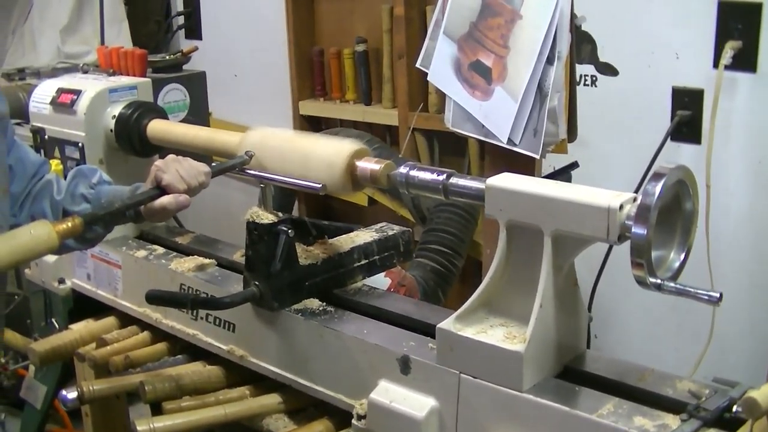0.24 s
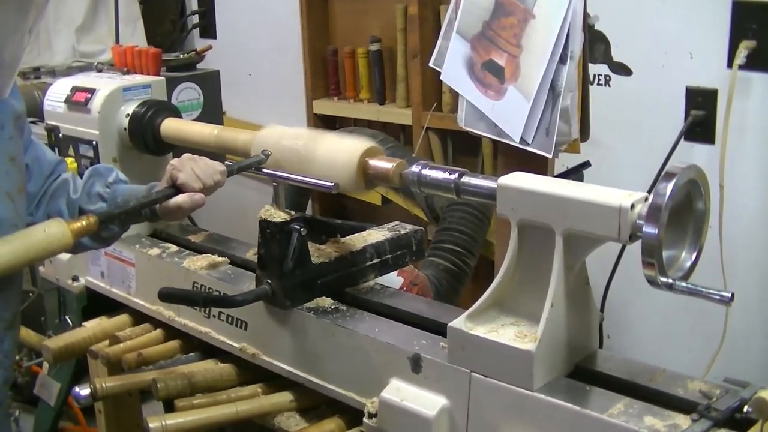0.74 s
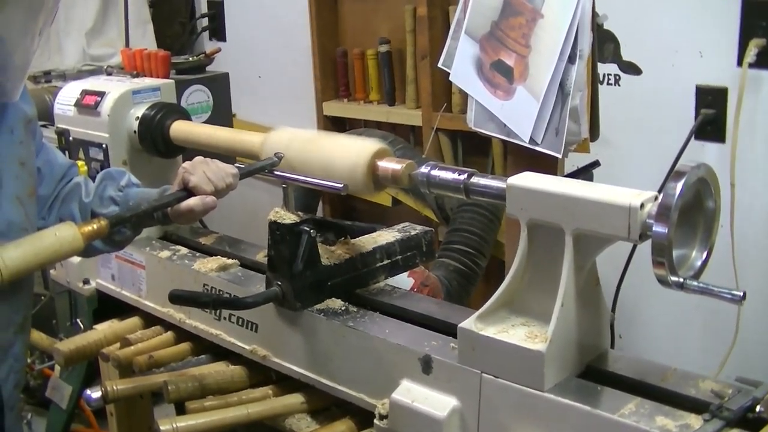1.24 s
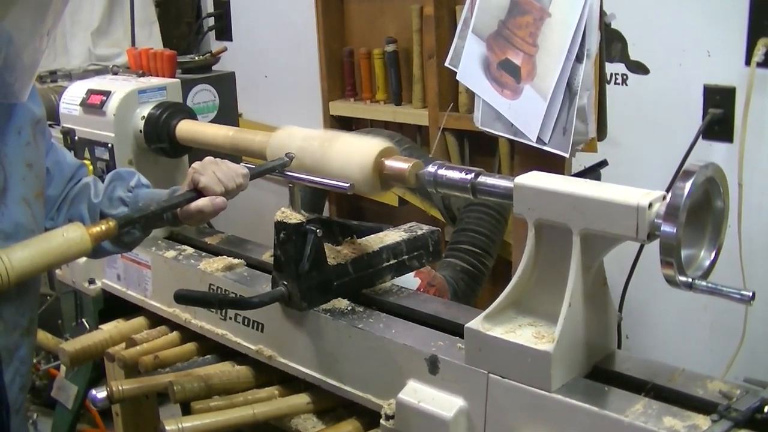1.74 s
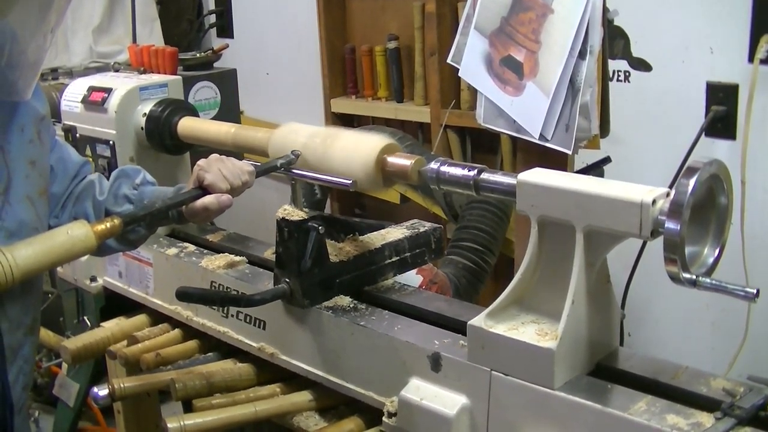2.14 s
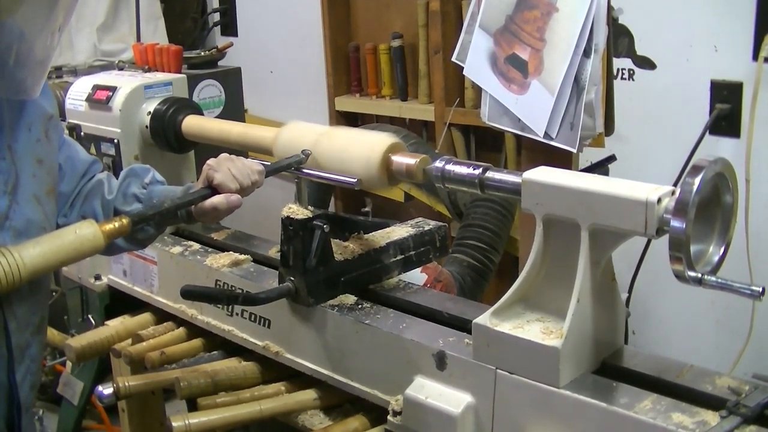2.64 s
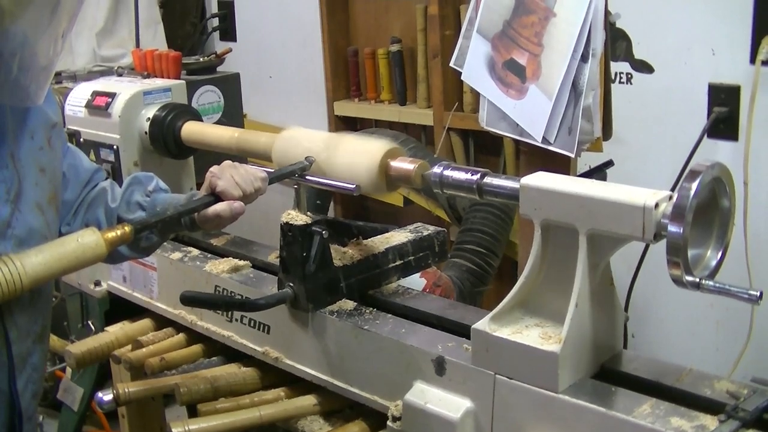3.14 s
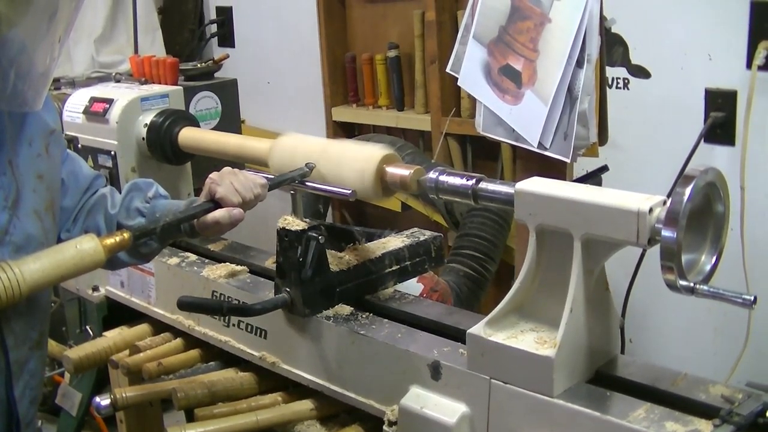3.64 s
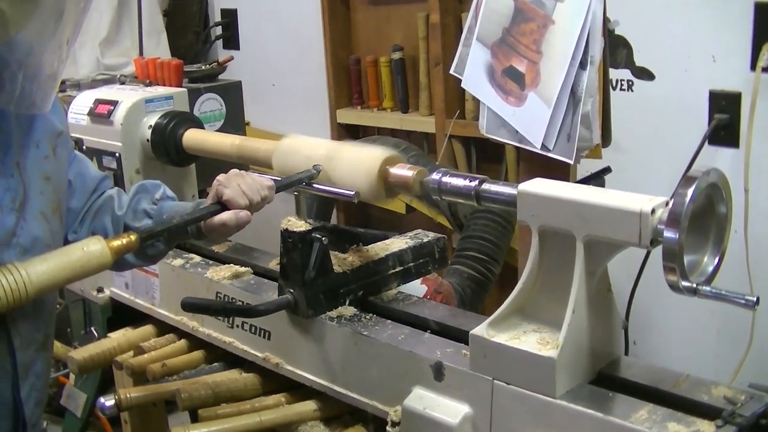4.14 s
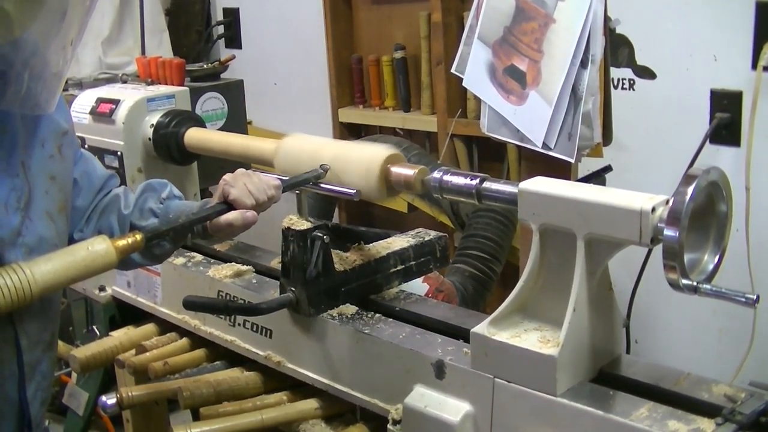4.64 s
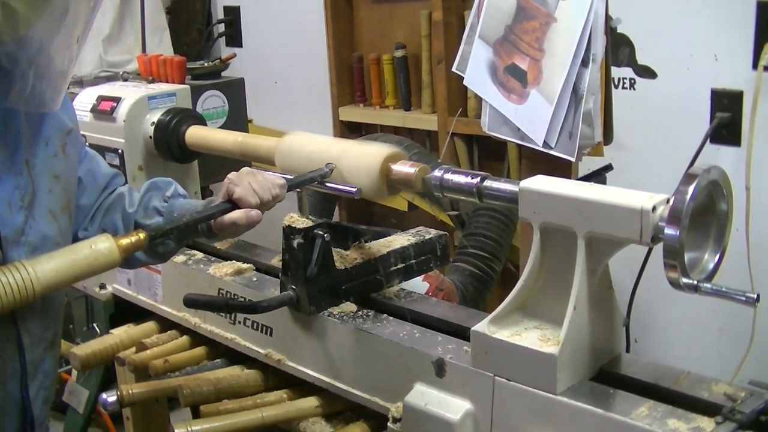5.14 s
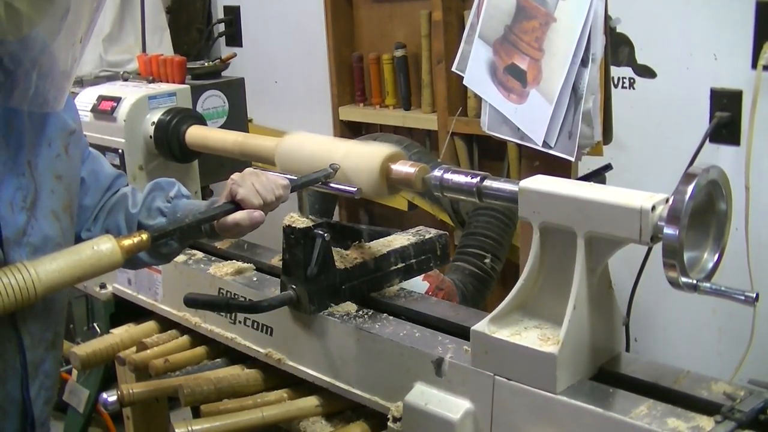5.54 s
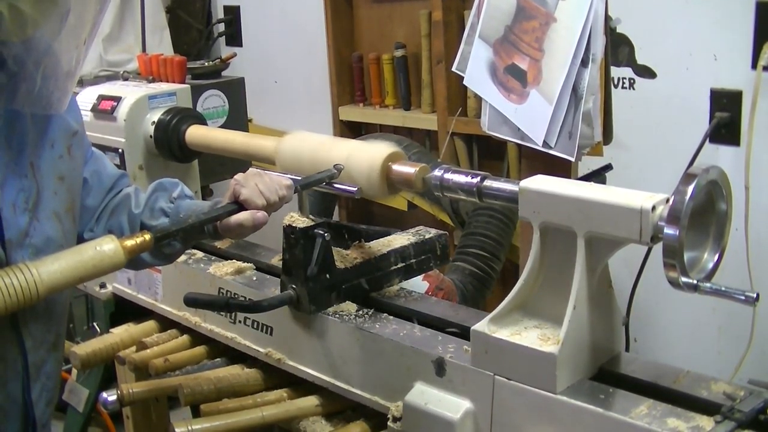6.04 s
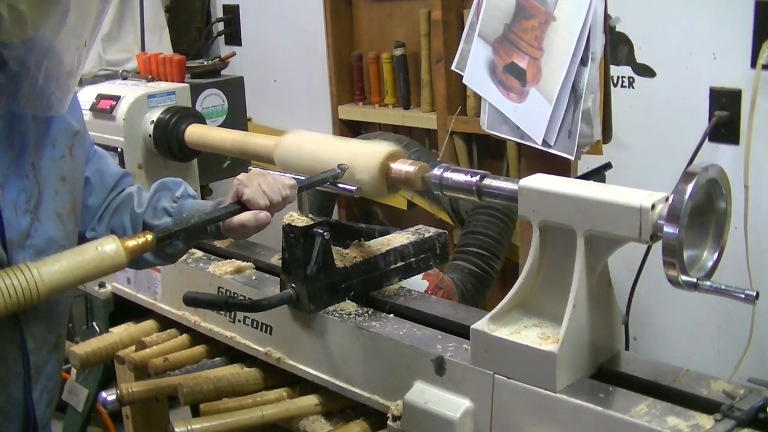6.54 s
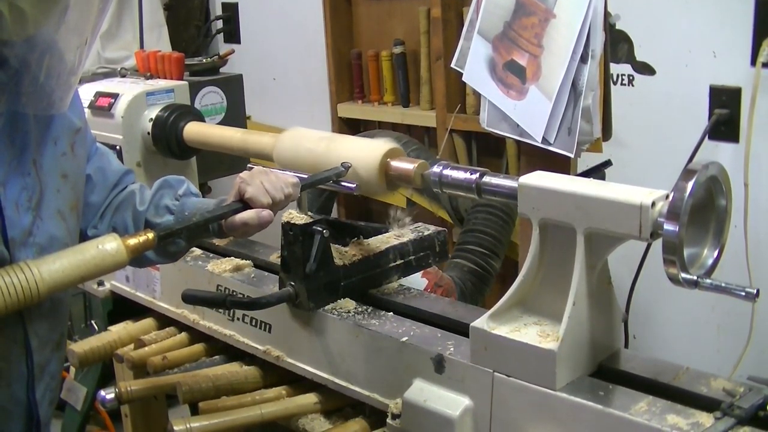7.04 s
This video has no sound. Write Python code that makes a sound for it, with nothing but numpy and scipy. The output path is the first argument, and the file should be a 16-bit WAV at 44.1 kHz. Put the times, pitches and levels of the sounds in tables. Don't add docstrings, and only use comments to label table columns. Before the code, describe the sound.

A wood lathe runs throughout while a steel gouge scrapes the spinning blank. The tearing is dense and raspy, roughened by a very fast buzzing flutter, with irregular hard catches and clacks. The tool rest rings and squeals around the upper mids, and chips tick on metal. Close, thin-bassed, slightly overloaded stereo microphone in a small room.

```python
import sys
import numpy as np
from scipy import signal
from scipy.fft import rfft, irfft, next_fast_len
from scipy.io import wavfile

SR = 44100
rng = np.random.default_rng(int(sys.argv[2]) if len(sys.argv) > 2 else 0)


def wrap_up_sound(samples):
    columns = np.atleast_2d(samples).T
    tamed = np.clip(columns, -1, 1)
    steps = np.round(tamed * 32767).astype(np.int16)
    wavfile.write(sys.argv[1], SR, steps)


def magnitude_from_level(level_db):
    exponent = np.asarray(level_db, float) / 20
    return 10 ** exponent


N = 320852
NOW_S = np.arange(N) / SR
GRAIN = rng.uniform(-1.7, 1.7, 200)


def rms_one(x):
    return x / np.sqrt(np.mean(x ** 2) + 1e-20)


def at_hz(points, hz):
    p = np.array(points)
    return np.interp(np.log(hz + 1), np.log(p[:, 0] + 1), p[:, 1])


def over_time(points):
    return np.interp(NOW_S, *np.transpose(points))


def bandpass(x, low_hz, high_hz):
    return signal.sosfilt(signal.butter(2, [low_hz, high_hz], "band", fs=SR, output="sos"), x)


def drift(rate_hz):
    r = np.exp(-40 * np.pi * rate_hz / SR)
    slow = signal.lfilter([1], [1, -2 * r, r * r], rng.standard_normal(N // 20 + 2002))[2000:]
    return np.interp(np.arange(N) / 20, np.arange(len(slow)), rms_one(slow))


def dying(times_s, sizes, tau_s):
    marks = np.full(N, 1e-12)
    at = np.clip((np.asarray(times_s) * SR).astype(int), 0, N - 1)
    np.add.at(marks, at, sizes)
    return signal.lfilter([1], [1, -np.exp(-1 / (tau_s * SR))], marks)


def resonate(x, hz, width_hz):
    r = np.exp(-np.pi * width_hz / SR)
    gain = np.sqrt((1 - r * r) / 2)
    return signal.lfilter(gain * np.array([1, 0, -1]), [1, -2 * r * np.cos(2 * np.pi * hz / SR), r * r], x)


def sing(turns, width_hz, force, steady):
    force = force[::4]
    r = np.exp(-4 * np.pi * width_hz / SR)
    shape = (2, len(force))
    shake = force * (rng.standard_normal(shape) + 1j * rng.standard_normal(shape))
    swing = signal.lfilter([np.sqrt(1 - r * r)], [1, -r], shake)
    swing = swing + steady * signal.lfilter([1 - r], [1, -r], force)
    return np.real(np.repeat(swing, 4, axis=1)[:, :N] * np.exp(2j * np.pi * turns))


def hand():
    # (time [s], level [dB])
    pressure = [
        (0.0, -21.5),
        (2.37, -22),
        (2.41, -23),
        (3.04, -22),
        (6.3, -20.5),
        (6.32, -19.5),
        (6.79, -19.5),
        (7.11, -21),
        (7.28, -23.5),
    ]
    # (time [s], depth [dB], length [s])
    bounces = [(0.515, -3, 0.18), (1.204, -4.5, 0.16), (1.815, -7, 0.048), (2.421, -2, 0.021),
               (2.502, -3.5, 0.018), (2.973, -5.5, 0.053), (3.252, -5, 0.041), (3.334, -6.5, 0.13),
               (3.636, -3, 0.049), (3.766, -4.5, 0.09), (4.193, -2, 0.073), (4.384, -4.5, 0.084),
               (4.574, -3, 0.25), (4.8, -2.5, 0.13), (5.105, -4, 0.058), (5.419, -11, 0.03),
               (5.594, -2, 0.076), (5.942, -4, 0.051), (6.375, -4.5, 0.19), (6.622, -6, 0.044),
               (6.98, -6, 0.043), (7.14, -3.5, 0.053)]
    # (time [s], level [dB])
    travel = [(0, -21.5), (.45, -20), (.6, -30), (.76, -18), (1.05, -26), (1.7, -30), (2.1, -42),
              (2.8, -40), (3.5, -27.5), (4.2, -51), (4.75, -31), (5.0, -27), (5.35, -20), (6.9, -21.5),
              (7.28, -25)]
    # (time [s], level [dB])
    seated = [(0, -21), (.6, -14.5), (1.1, -31), (1.5, -30), (2.33, -18), (2.45, -29), (2.85, -17),
              (3.2, -19), (3.3, -12), (3.72, -26.5), (3.8, -21), (4.3, -20), (4.5, -15.5), (5.3, -19),
              (6.2, -21), (6.6, -17.5), (6.8, -14), (7.0, -41)]
    pressure_db = over_time(pressure)
    coarse_s = NOW_S[::20]
    ease_db = sum(db * np.exp(-(2.48 * (coarse_s - s) / length_s) ** 2) for s, db, length_s in bounces)
    ease_db = np.interp(NOW_S, coarse_s, ease_db)
    scrape_db = pressure_db + 0.78 + ease_db
    blank_db = over_time(travel) + 0.54 * ease_db
    rest_db = over_time(seated) + 2 * ease_db
    hiss_db = pressure_db - 9 - 0.013 * ease_db + 4 * drift(6)
    return scrape_db, blank_db, rest_db, hiss_db


def ridges(tick_db, spread_db, tau_s):
    first_s, spacing_s = .0012, .004995
    heights_db = [7, -3, 11.5, 14, 15.5, -2.5, 18, 8.5]
    times_s = np.arange(first_s, N / SR, spacing_s)
    uneven_db = spread_db * rng.standard_normal(len(times_s))
    height = magnitude_from_level(tick_db + np.resize(heights_db, len(times_s)) + uneven_db)
    return rms_one(1 + dying(times_s, height, tau_s))


def corner_hits():
    first_s, turn_s, spread_db, dig_force_db = .0203, .03996, 4.5, -1.5
    # (time [s], bite [dB], early [ms])
    corner = [(0, -28, -2), (.72, -47, -3.5), (1.25, -19.5, 1), (1.6, -16, -3), (2.15, -24, -2.5),
              (2.6, -74, -19), (2.9, -24, 6), (3.3, -21, -3.5), (3.88, -32, 15), (3.92, -27, 3),
              (4.42, -21, 8), (4.46, -37, -4), (5.45, -47, -4), (5.85, -32, 1), (6.731, -22, 2),
              (7.0, -43, 14), (7.2, -22, -6)]
    # (time [s], peak level [dB])
    digs = [(0.1022, -38), (0.4599, -22), (0.6584, -25), (0.778, -13), (1.1398, -15), (1.499, -33),
            (1.699, -37), (1.8994, -44), (1.978, -33), (2.0582, -39), (2.0986, -47), (2.178, -13),
            (2.338, -18), (2.9567, -6.5), (3.0994, -41), (3.817, -14.5), (3.935, -38), (4.016, -12),
            (4.0976, -34), (4.1719, -25), (4.3337, -10), (4.595, -13.5), (4.637, -12.5), (5.619, -13),
            (5.698, -9.5), (5.8187, -6.5), (5.896, -10), (6.054, -13), (6.18, -7), (6.455, -17)]
    s, bite_db, early_ms = np.transpose(corner)
    turn = np.arange(first_s, N / SR, turn_s)
    hit_s = turn - np.interp(turn, s, early_ms) / 1000
    hit_db = np.interp(turn, s, bite_db) + spread_db * GRAIN[:len(turn)]
    dig_s, dig_db = np.transpose(digs)
    return np.r_[hit_s, dig_s], np.r_[hit_db, dig_db + dig_force_db]


def catches(hz, spread_db, tau_s):
    # (time [s], peak level [dB], dull part [dB], bright part [dB])
    caught = [(0.301, -20, -8, -20), (0.41, -30, -2, 8), (0.513, -23, -5, -24), (0.9406, -11, -21, -29),
              (1.002, -9, -15, -34), (1.052, -10.5, -18, -13), (1.2088, -16.5, -35, -2),
              (1.778, -31, -17, -19), (2.0184, -33, -31, -28), (2.3714, -14.5, -15, -15),
              (2.591, -12, -12, -14), (2.878, -11.5, -37, -6), (3.143, -23, -41, -38),
              (3.2092, -17, -22, -28), (3.284, -12, -31, -23), (3.4007, -18, -20, -19),
              (3.605, -12, -29, -27), (3.777, -10, -24, -27), (4.062, -18, -19, -38),
              (4.413, -11.5, -49, -22), (5.057, -14.5, -11, -14), (5.198, -8, -29, -37),
              (5.306, -23, -32, -2), (5.4374, -12, -24, -27), (6.2387, -11, -20, -31),
              (6.6903, -21, -15, 2), (6.846, -12.5, -26, -31), (6.8977, -7, -19, -13),
              (7.004, -19, -17, -19.5), (7.056, -12, -32, -13)]
    hit_s, hit_db = corner_hits()
    hits = [hit_s, hit_db, 0 * hit_s - 19.5, 0 * hit_s - 15]
    s, peak_db, dull_db, bright_db = np.hstack([np.transpose(caught), hits])
    if hz < 1200:
        part_db = dull_db + 25
    elif hz > 6000:
        part_db = bright_db + 34.5
    else:
        part_db = 0
    return dying(s, magnitude_from_level(peak_db + part_db + spread_db * rng.standard_normal(len(s))), tau_s)


def fibres(spread_db):
    return rms_one(rng.standard_normal((2, N)) * magnitude_from_level(spread_db * rng.standard_normal(N)))


def scrape(contact, scrape_db, hiss_db):
    # (frequency [Hz], density [dB per Hz])
    colour = [(88, -73), (150, -112), (303, -14), (494, -10.5), (759, 4), (1020, -8), (1240, 4),
              (2180, 1.5), (3100, 1), (4320, -7), (5150, -58), (7040, -37), (9260, -52), (14500, -94),
              (16000, -51)]
    out = 0
    edges_hz = 150 * 2 ** np.arange(0, 7, .5)
    grains = [fibres(1.9), fibres(3.1)]
    for k, (low_hz, high_hz) in enumerate(zip(edges_hz, edges_hz[1:])):
        hz = np.sqrt(low_hz * high_hz)
        patchy = magnitude_from_level(2.2 * drift(9))
        steady = patchy * magnitude_from_level(hiss_db + 33.0 if hz > 6500 else scrape_db - 3.0)
        touch = np.clip(hz / 1500, 0, 1)
        tear = magnitude_from_level(-8.0) * catches(hz, 1.0, 0.015 * (1000 / hz) ** 0.35)
        crack = magnitude_from_level(-35.0) * catches(hz, 0.73, 0.00025)
        force = steady * (1 + touch * (contact - 1)) + touch * (tear + crack)
        out = out + magnitude_from_level(at_hz(colour, hz) + 6) * bandpass(grains[k % 2] * force, low_hz, high_hz)
    return out


def blank(level_db, contact):
    # (time [s], frequency [Hz])
    pitch = [
        (0, 960),
        (.25, 966),
        (.45, 972),
        (.75, 977),
        (4.8, 978),
        (6.08, 977),
        (6.2, 958),
        (6.6, 950),
        (7.0, 938),
        (7.28, 932),
    ]
    # (pitch ratio, width [Hz], level [dB], self-sustained share)
    modes = [(.915, 15, -8, 0.5), (.965, 11, -13, 0), (1, 18, -8, 2)]
    turns = np.cumsum(over_time(pitch) + 2 * drift(8)) / SR
    force = magnitude_from_level(level_db) * contact + magnitude_from_level(-28) * catches(970, 1.3, 0.0025)
    return sum(magnitude_from_level(db) * sing(ratio * turns, width_hz, force, steady) for ratio, width_hz, db, steady in modes)


def ringing(pitches_hz, modes, level_db, contact, catch_db):
    out, shake = 0, rng.standard_normal((2, N))
    for hz, (width_hz, db, place_s, loss_db) in zip(pitches_hz, modes):
        cut = magnitude_from_level(level_db + 3.0 * drift(34.0)) * contact
        kick = magnitude_from_level(catch_db) * catches(hz, 2.5, 0.0065)
        place_db = db - loss_db * abs(NOW_S - place_s)
        out = out + magnitude_from_level(place_db) * resonate((cut + kick) * shake, hz, width_hz)
    return out


def tool_and_bed(scrape_db, contact):
    pitches_hz = [764, 1280, 1377, 1705, 2010, 2310, 2560, 2635, 3580, 3880, 4040, 3100, 2960, 4960, 5145,
                  5620, 5960, 6300, 6490, 9200]
    # (width [Hz], level [dB], time at best place [s], loss away from it [dB per s])
    modes = [(24.6, -27, 0.54, 0.5), (24.7, -20.5, 1.8, 0), (34.4, -14, 0.1, 1), (45, -10, 3.4, 8),
             (62, -12, 4.8, 0.5), (52.3, -11, 4.2, 8), (84.5, -8, 0.59, 9), (46.6, -11, 4.7, 7),
             (39.6, -13, 2.5, 5.5), (91, -13.5, 0.35, 0.5), (78, -9, 3.28, 6.5), (40, -16, 4.6, 13),
             (59.7, -14, 7.05, 34), (69, -18, 3.3, 3.5), (169, -16, 4.8, 0), (197, -16, 6.25, 3),
             (115, -19.5, 1.6, 2.5), (246, -21, 4.14, 4.5), (143, -33, 1.16, 53), (555.56, -36, 6.2, 0.5)]
    return ringing(pitches_hz, modes, scrape_db + 1.0, contact, -9.0)


def steel_rest(rest_db, contact):
    pitches_hz = [3055, 3165, 3230]
    # (width [Hz], level [dB], time at best place [s], loss away from it [dB per s])
    modes = [(61.7, -2, 5.1, 0.53), (20.5, 0.5, 4.14, 5.1), (50, -6, 1.1, 2.9)]
    return ringing(pitches_hz, modes, rest_db - 9.5, contact, -48)


def squeal(contact):
    # (time [s], level [dB])
    course = [(0, -51), (.3, -44), (1.6, -39), (1.8, -40), (2.3, -34), (2.45, -51), (3.7, -51), (3.85, -49),
              (4.3, -52), (4.45, -43), (5.05, -34), (5.15, -43), (5.3, -35.5), (5.501, -43), (5.751, -39),
              (6.25, -39), (6.4, -58), (7.28, -63)]
    # (frequency [Hz], width [Hz], level [dB], self-sustained share)
    modes = [(3070, 19, 4, .8), (3166, 13, 5.5, .8)]
    force = magnitude_from_level(over_time(course)) * contact
    out = 0
    for hz, width_hz, db, steady in modes:
        turns = np.cumsum(hz + 8 * drift(6.77)) / SR
        out = out + magnitude_from_level(db) * sing(turns, width_hz, force, steady)
    return out


def whistle(contact):
    # (time [s], frequency [Hz], level [dB])
    course = [(0, 4590, -43.5), (.65, 4590, -34), (1.0, 4580, -39.5), (1.5, 4580, -32.5),
              (1.948, 4520, -46), (2.4, 4430, -37), (2.7, 4420, -64), (3.5, 4400, -41), (4.1, 4480, -37),
              (4.5, 4560, -49), (5.0, 4600, -40), (5.5, 4600, -52), (5.8, 4600, -38.5), (6.3, 4560, -44),
              (6.85, 4480, -43), (7.28, 4480, -45)]
    s, hz, db = np.transpose(course)
    turns = np.cumsum(np.interp(NOW_S, s, hz)) / SR
    return sing(turns, 18, magnitude_from_level(np.interp(NOW_S, s, db)) * contact, 1.1)


def struck(events, ring_db, ring_s, crack_db, low_hz, high_hz):
    crack_s = 0.00098
    out, s = np.zeros((2, N + SR)), np.arange(SR // 12) / SR
    for at_s, db, hz in events:
        ring = magnitude_from_level(ring_db) * np.sin(2 * np.pi * hz * s) * np.exp(-s / ring_s)
        crack = magnitude_from_level(crack_db) * rng.standard_normal((2, len(s))) * np.exp(-s / crack_s)
        out[:, int(at_s * SR):][:, :len(s)] += magnitude_from_level(db + 5.5) * (ring + crack)
    return bandpass(out[:, :N], low_hz, high_hz)


def ridge_slaps():
    # (time [s], peak level [dB], frequency [Hz])
    slaps = [(0.1615, -5, 1384), (0.3012, -10, 3010), (0.4604, -2.5, 3070), (0.6454, -2.5, 2450),
             (0.7811, -1, 1370), (0.9398, 0, 1930), (1.0006, -3, 3070), (1.05, -3, 3070),
             (1.2098, -3.5, 2020), (1.5, -3, 3030), (1.699, -20, 4050), (1.7794, -4, 2940),
             (1.8382, -5, 1970), (1.9789, -19, 1980), (2.019, -5, 3010), (2.0588, 0, 3100),
             (2.0986, -16, 1710), (2.1794, -7, 3030), (2.339, -7, 3060), (2.4593, -3, 4090),
             (2.6489, -6, 2800), (2.9582, -5, 3980), (3.0984, -10, 3050), (3.2087, -9, 4000),
             (3.5603, -1, 1763), (3.7803, -1.5, 3080), (3.8178, 1.5, 1710), (3.94, 4.5, 1975),
             (4.0124, -2, 3010), (4.0616, -5, 4020), (4.0976, 0, 3090), (4.1717, -4, 2730),
             (4.4119, -2, 2010), (4.5665, -3, 1920), (4.596, -12, 3000), (4.6409, -21, 3160),
             (5.058, 2, 1440), (5.1473, 0, 3050), (5.1995, -9.5, 2970), (5.3046, -2, 3030),
             (5.3795, -9, 3180), (5.4365, 0, 3040), (5.6193, -12, 3130), (5.6989, -1, 2130),
             (5.8222, -8, 2100), (5.897, 0.5, 1644), (5.9696, -7, 3100), (6.0546, -4, 1990),
             (6.133, -6, 2010), (6.1799, -21, 1930), (6.2397, -13, 2000), (6.3734, -18, 2050),
             (6.4542, -5, 2040), (6.6894, -10, 1960), (6.738, 0.5, 2880), (6.8468, 2, 2950),
             (6.8982, -4, 2980), (7.006, -7, 4010), (7.0569, -11, 3000), (7.1726, -6, 1970)]
    return struck(slaps, ring_db=-19.5, ring_s=0.01, crack_db=-15, low_hz=1600, high_hz=5000)


def blank_jolts():
    # (time [s], peak level [dB], frequency [Hz])
    jolts = [(0.008, -8.5, 952), (0.048, -14, 940), (0.188, -12, 777), (0.307, -16, 955),
             (0.415, -9.5, 960), (0.465, -13, 753), (0.79, -14, 764), (0.876, -34, 990), (1.149, -18, 730),
             (1.295, -16, 1000), (1.389, -13, 680), (1.789, -19, 760), (1.843, -12.5, 655),
             (2.029, -17, 747), (2.268, -16, 760), (2.301, -21, 767), (2.545, -12.5, 670), (2.6, -13, 663),
             (2.632, -20, 754), (2.957, -18, 740), (3.684, -12.5, 804), (3.823, -11.5, 664),
             (3.858, -12, 780), (4.066, -19, 760), (4.127, -30, 774), (4.227, -18, 776), (4.862, -18, 876),
             (5.198, -23, 880), (5.311, -23, 950), (5.383, -12, 982), (5.439, -27, 960), (5.501, -12, 963),
             (5.622, -16, 963), (5.741, -8, 952), (5.961, -16, 953), (6.053, -8, 1006), (6.238, -17, 910),
             (6.291, -12, 975), (6.342, -9.5, 980), (6.38, -11, 1000), (6.41, -9, 940), (6.57, -10, 938),
             (6.63, -10, 927), (6.691, -5.5, 950), (6.783, -11, 880), (6.848, -10, 916), (7.007, -13, 915),
             (7.056, -10, 915), (7.14, -15, 936), (7.178, -6, 906), (7.222, -7, 928), (7.26, -19, 900)]
    return struck(jolts, ring_db=-13.5, ring_s=0.017, crack_db=-15, low_hz=460, high_hz=1300)


def tip_skips():
    # (time [s], peak level [dB], frequency [Hz])
    skips = [(0.2049, -11, 5300), (0.4105, -10, 5330), (0.9448, -8, 5000), (1.0086, -10, 4540),
             (1.0505, -6, 4540), (1.2092, -8, 5400), (1.4945, -7, 4630), (1.699, -11, 6460),
             (1.7784, -18, 5960), (2.0183, -7, 4490), (2.0587, -8, 6500), (2.0991, -24, 5030),
             (2.1385, -5, 6000), (2.4583, -18, 4270), (2.8774, -17, 6400), (2.9572, -20, 6480),
             (3.266, -17, 5140), (3.6067, -24, 4340), (3.6621, -10, 4380), (3.7364, -11, 6100),
             (3.7763, -17, 4950), (3.8935, -23, 5010), (3.933, -12, 4400), (3.9739, -7, 4480),
             (4.0128, -6, 5000), (4.0931, -9, 5130), (4.1325, -9, 4970), (4.1724, -9, 5180),
             (4.3355, -7, 6070), (4.4119, -11, 5140), (4.6364, -17, 6480), (5.0095, -10, 5570),
             (5.0559, -11, 5150), (5.2036, -14, 4540), (5.3043, -10, 5630), (5.436, -11, 5500),
             (5.5413, -22, 5620), (5.7628, -7, 5150), (5.8152, -8, 5130), (5.9025, -11, 4470),
             (6.1794, -11, 5270), (6.2387, -9, 5100), (6.6892, -11, 5220), (6.9022, -9, 4930),
             (7.0579, -8, 4490)]
    return struck(skips, ring_db=-15, ring_s=0.005, crack_db=-11, low_hz=3300, high_hz=7800)


def snaps():
    # (time [s], peak level [dB], frequency [Hz])
    cracks = [
        (2.369, -12, 7650),
        (2.4594, -10.5, 7700),
        (3.892, -8, 7300),
        (3.901, -16, 7650),
        (6.7342, -17.5, 7700),
        (6.796, -18, 7600),
        (6.8946, -11, 6080),
    ]
    out = 0
    for s, db, hz in cracks:
        burst = dying([s], magnitude_from_level(db - 1.5), 0.0021) * rng.standard_normal(N)
        out = out + resonate(burst, hz, 640)
    return out


def chips():
    # (time [s], peak level [dB])
    flying = [(1.06, -22), (1.58, -16), (1.7, -33), (1.7634, -18), (2.0183, -31), (2.139, -21),
              (2.368, -22), (2.4099, -19), (2.459, -15), (2.5371, -20), (2.837, -25), (2.8774, -21),
              (2.9617, -28), (3.2171, -30), (3.6067, -28), (3.7763, -28), (3.8931, -35), (4.0123, -26),
              (4.2762, -16.5), (4.3261, -16), (4.4169, -25), (4.459, -18), (4.6359, -32), (5.0554, -19),
              (5.8152, -20), (5.8945, -24), (6.095, -17), (6.6937, -26), (6.7341, -22), (6.7945, -19),
              (6.8433, -18), (6.8902, -17), (7.1591, -26), (7.2389, -21)]
    hit_s, hit_db = corner_hits()
    s, peak_db = np.hstack([np.transpose(flying), [hit_s, hit_db - 17]])
    patter = dying(s, magnitude_from_level(peak_db), 0.003) * rng.standard_normal((2, N))
    return bandpass(patter, 7000, 16000)


def machine():
    # (frequency [Hz], level [dB], waver [Hz], lean [dB per s])
    tones = [(275.3, -59, 3, 0), (325.3, -55, 2, 0), (350.4, -58, 2, 0), (400.4, -59, 2, 0),
             (425.4, -55, 2, 0), (450.4, -58, 2, 0), (550.5, -44.5, 1.5, -.5), (600.5, -45, 2, 1.5),
             (663, -41, 1.5, -.7), (763.5, -37, 1.5, -.2), (8952, -53, 1.5, 0), (9066, -48.5, 1.5, 0)]
    from_middle_s = NOW_S - N / SR / 2
    out = 0
    for hz, db, waver_hz, lean_db in tones:
        level = magnitude_from_level(db + lean_db * from_middle_s + 0.95 * waver_hz * drift(2.3))
        turns = np.cumsum(hz + waver_hz * drift(4.75)) / SR
        out = out + np.sqrt(2) * level * np.sin(2 * np.pi * turns)
    return out


def shop(size):
    t60_s, echo_db = .2, -11
    s = np.arange(SR // 3) / SR
    echoes = rng.standard_normal(len(s)) * magnitude_from_level(-60 * s / t60_s) * (s > .002)
    return 1 + magnitude_from_level(echo_db) * rfft(echoes / np.linalg.norm(echoes), size)


def left_port(right, scattered, hz):
    # (frequency [Hz], level [dB])
    balance = [(60, -7.5), (110, 20), (200, 0), (380, -2), (700, -10.5), (1290, -17), (2380, -13),
               (4400, -10), (8120, -12.5), (15000, -8.5)]
    # (frequency [Hz], lead [rad])
    lead = [(0, 0), (260, -1.3), (1460, -2.3), (1890, -3.6), (2670, -4.7), (3010, -4.5), (4820, -5.2),
            (6290, -4.7), (8960, -4.5), (9390, -6.1), (9910, -5.1), (12300, -5.9), (14700, -5.8),
            (16000, -6.1)]
    # (frequency [Hz], share)
    common = [(100, .5), (500, .9), (1000, .75), (2000, .8), (4000, .72), (8000, .4), (14000, .35)]
    share = np.clip(at_hz(common, hz), 0, 1)
    turned = share * right * np.exp(1j * at_hz(lead, hz))
    return magnitude_from_level(at_hz(balance, hz)) * (turned + np.sqrt(1 - share ** 2) * rfft(scattered, size_of(hz)))


def size_of(hz):
    return int(round(SR / hz[1]))


def scene():
    scrape_db, blank_db, rest_db, hiss_db = hand()
    contact = ridges(-8.5, 2.6, 0.0006)
    cut = scrape(contact, scrape_db, hiss_db) + blank(blank_db - 6.0, contact)
    metal = tool_and_bed(scrape_db, contact) + steel_rest(rest_db, contact)
    tones = squeal(contact) + whistle(contact)
    blows = ridge_slaps() + blank_jolts() + tip_skips()
    near, scattered = cut + metal + tones + blows + chips()
    size = next_fast_len(N + SR // 3)
    hz = np.arange(size // 2 + 1) * SR / size
    right = rfft(near + snaps(), size) * shop(size) + rfft(machine(), size)
    return magnitude_from_level(4.5) * irfft([left_port(right, scattered, hz), right], size)[:, :N]


def lurches():
    # (time [s], peak level [dB])
    jerks = [(0.011, -48), (0.778, -70), (2.02, -66), (2.46, -66), (2.88, -62), (3.78, -68), (1.05, -52),
             (1.209, -65), (4.021, -52), (5.204, -44), (5.339, -57), (5.437, -59), (5.7, -45), (5.904, -51),
             (6.178, -43), (6.7, -50), (6.851, -45), (6.898, -46)]
    s, peak_db = np.transpose(jerks)
    return dying(s, magnitude_from_level(peak_db + 24.0), 0.00038) * [[.1], [1]]


def band_limit(x):
    return signal.sosfilt(signal.butter(12, 16000, fs=SR, output="sos"), x)


def record(dry):
    ceiling = .86
    clipped = np.clip(dry, -ceiling, ceiling)
    thin = signal.sosfilt(signal.butter(7, 225, "high", fs=SR, output="sos"), clipped)
    thin = signal.sosfilt(signal.butter(2, 11500, fs=SR, output="sos"), thin)
    bent = np.clip(thin - 0.027 * thin ** 3 + lurches(), -.99, .99)
    return band_limit(bent)


dry = scene()
out = record(dry)
wrap_up_sound(out)
```